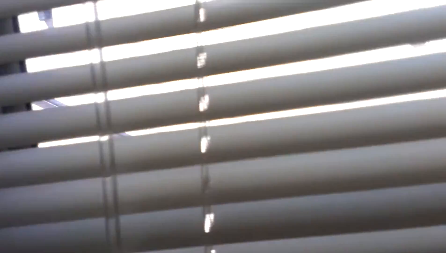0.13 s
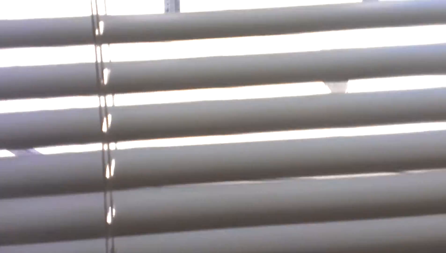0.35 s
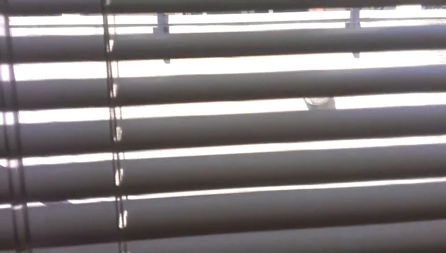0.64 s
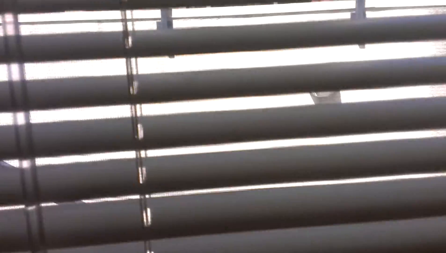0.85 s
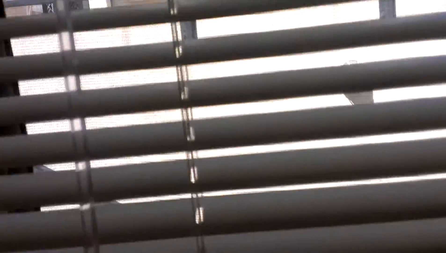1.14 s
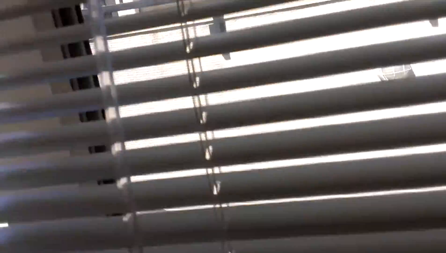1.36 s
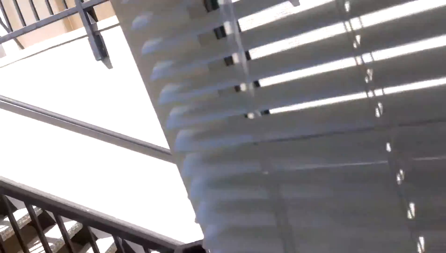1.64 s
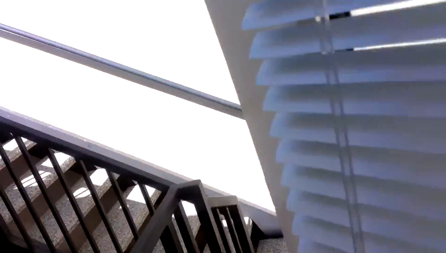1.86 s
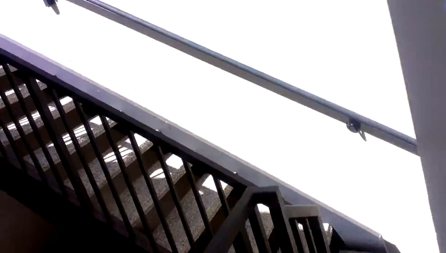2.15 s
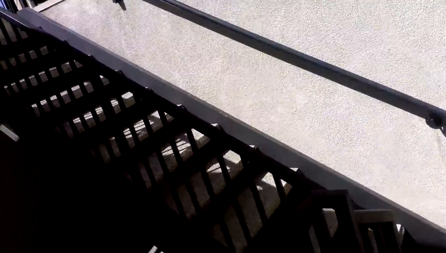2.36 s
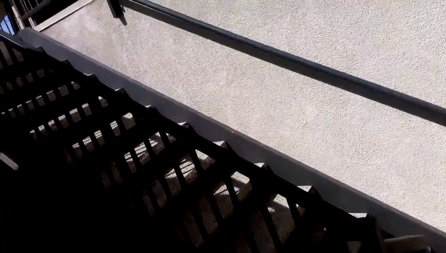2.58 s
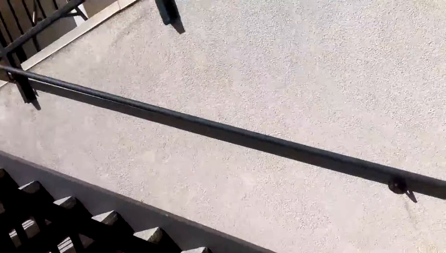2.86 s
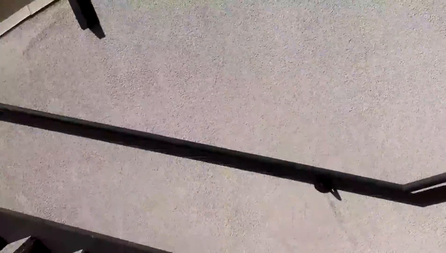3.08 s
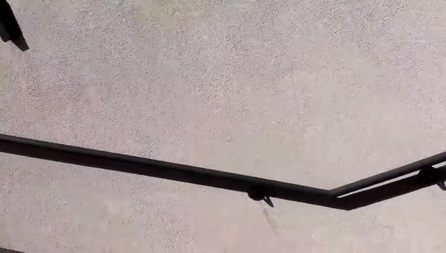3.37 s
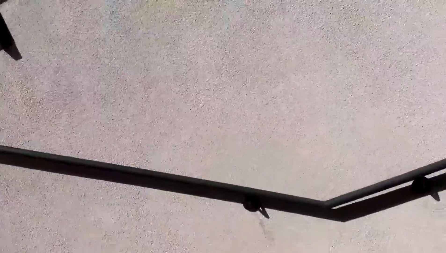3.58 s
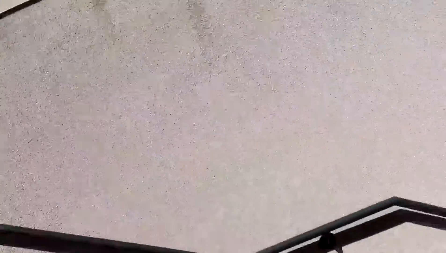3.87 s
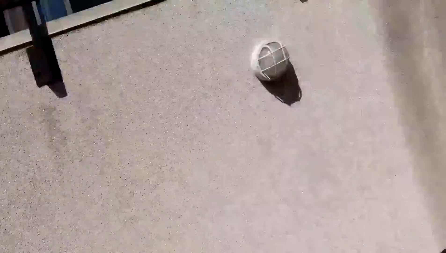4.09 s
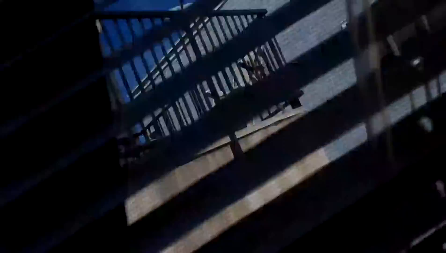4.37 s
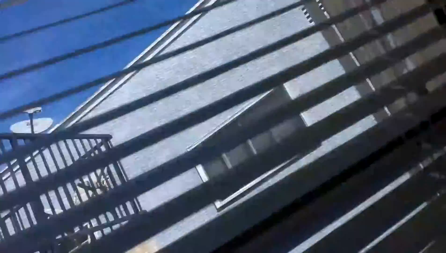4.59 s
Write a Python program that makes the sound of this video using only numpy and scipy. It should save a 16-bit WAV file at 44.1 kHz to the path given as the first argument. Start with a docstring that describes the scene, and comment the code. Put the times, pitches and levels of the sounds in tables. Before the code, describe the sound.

Hard bright clicks and rattles of window blind slats over dull door bumps, thinning to near quiet before another short burst of clatter.

```python
"""Small quiet room: plastic blind slats clack, rattle and scrape close by as the door carrying them is handled.
Clacks are beating damped modes plus a noise crack; ticks are band-passed snaps with a hollow knock behind.
Rattle is lumpy stereo noise and small chips through slat resonances, gated by shakes of the blind.
Rail and frame ring in low modes; the door rumbles under pushes and rings low at blows.
The room answers with decaying noise tails; under it all lie room air and a thin whine."""
import sys
import numpy as np
from scipy import signal
from scipy.fft import rfft, irfft, next_fast_len
from scipy.io import wavfile
from scipy.ndimage import uniform_filter1d, map_coordinates

SR = 44100
rng = np.random.default_rng(int(sys.argv[2]) if len(sys.argv) > 2 else 0)


def wav_record(signal):
    """Record a signal, one row per channel, as 16-bit PCM in the file named by sys.argv[1]."""
    frames = np.transpose(np.atleast_2d(signal))
    bounded = np.clip(frames, -1, 1)
    # unit amplitude maps onto the largest positive 16-bit level
    quanta = np.round(bounded * 32767).astype(np.int16)
    wavfile.write(sys.argv[1], SR, quanta)


N = 208271


def amp(db):
    """Decibels to gain."""
    return 10 ** (np.asarray(db) / 20)


def unit(x):
    """Scaled to rms 1."""
    return x / np.sqrt(np.mean(x ** 2) + 1e-20)


def along(points, hz):
    """Interpolates (f/Hz, value) points on a log frequency axis."""
    f, v = np.transpose(points)
    return np.interp(np.log(hz + 1), np.log(f + 1), v)


def curves(rows):
    """One per-sample curve for each column after t/s."""
    s, *cols = np.transpose(rows)
    return [np.interp(np.arange(N) / SR, s, c) for c in cols]


def wobble(rate_hz):
    """Smooth random curve with rate_hz knots a second."""
    knots = rng.standard_normal(int(N * rate_hz / SR) + 4)
    return map_coordinates(knots, [np.arange(N) * rate_hz / SR])


def filtered(x, response):
    """x through a complex frequency response."""
    m = next_fast_len(N + SR // 2)
    return irfft(rfft(x, m) * response(np.fft.rfftfreq(m, 1 / SR)), m)[..., :N]


def modes(table):
    """Causal response of (f/Hz, width/Hz, level/dB) resonances, alternating in sign."""
    def response(f):
        total = 0
        for k, (c, w, db) in enumerate(table):
            total = total + (-1) ** k * amp(db) * 1j * f * w / (c * c - f * f + 1j * f * w)
        return total
    return response


def shaped(spectrum):
    """Gain of a (f/Hz, level/dB) spectrum."""
    return lambda hz: amp(along(spectrum, hz))


def grainy(response, spread_db, rate_hz):
    """Stereo noise of rms 1, its level lumped at random into short contacts, through a response."""
    # left-right likeness: f/Hz, correlation
    likeness = [(60, 0.98), (180, 1), (550, 0.85), (1650, 0.1), (4970, 0.2), (15000, 0.56)]

    def mid_side(hz):
        turn = np.arccos(np.clip(along(likeness, hz), -1, 1)) / 2
        return response(hz) * [np.cos(turn), np.sin(turn)]

    lumps = amp(spread_db * np.clip(wobble(rate_hz), -2, 2))
    mid, side = filtered(rng.standard_normal((2, N)) * lumps, mid_side)
    return unit(np.array([mid + side, mid - side]))


def room(x):
    """Fresh noise tail for each ear, each frequency decaying at its own speed."""
    # room decay: f/Hz, t60/s
    decay = [(200, 0.22), (2000, 0.14), (6000, 0.39), (14000, 0.2)]
    hz, t, z = signal.stft(rng.standard_normal((2, SR // 3)), SR, nperseg=256)
    fade = amp(-60 * t / along(decay, hz)[:, None])
    tail = signal.istft(z * fade, SR, nperseg=256)[1]
    wet = signal.fftconvolve(x[None], tail / np.linalg.norm(tail[0]), axes=1)
    return np.pad(wet, ((0, 0), (200, 0)))  # 200-sample pre-delay


def ring(hz, db, t60_s, t):
    """One damped mode."""
    return amp(db - 60 * t / t60_s) * np.sin(2 * np.pi * hz * t)


def add(out, s, sound):
    """Mixes a sound in at time s."""
    i = round(s * SR)
    out[..., i:i + sound.shape[-1]] += sound


def spells(rows):
    """Rise, hold, fall per row, powers adding; a main gain curve, then one per relative column."""
    rise_db = 15.5  # depth below peak at the start time
    t, power = np.arange(0, N + 32, 32) / SR, 0
    for s, rise_s, hold_s, db, fall_db_s, *rel_db in rows:
        after = t - s
        climb_db = rise_db * np.clip(1 - after / rise_s, 0, None)
        drop_db = fall_db_s * np.clip(after - rise_s - hold_s, 0, None)
        columns = amp(2 * np.array([0, *rel_db]))[:, None]
        power = power + amp(2 * (db - climb_db - drop_db)) * columns
    return [np.interp(np.arange(N) / SR, t, gain) for gain in np.sqrt(power)]


def floor():
    """Room air as shaped noise, and a thin 15 kHz electronic whine that drops in level."""
    # air spectrum: f/Hz, level/dB
    air_spectrum = [(12, -36.5), (20, -9), (31, -7), (49, -35), (124, 4.5), (297, -10), (361, -6),
                    (566, -24), (1180, -35), (5830, -31), (9150, -37.5), (14700, -36.5), (16500, -64.5)]
    # air level: t/s, level/dB
    air_level = [(0, -59), (0.2, -49), (0.3, -77), (0.38, -62), (0.8, -49.5), (4.72, -48.5)]
    # whine level before a 7.5 dB lift: t/s, level/dB
    whine_level = [(0, -65), (2.6, -70.5), (2.7, -87)]
    tone = np.sin(2 * np.pi * 15000 * np.arange(N) / SR)
    whine = amp(curves(whine_level)[0] + 7.5) * tone
    air = grainy(shaped(air_spectrum), spread_db=0.0, rate_hz=34)
    return amp(curves(air_level)[0]) * air + whine


def door():
    """Door panel rumbles under the hand and answers each blow with a short low ring."""
    # pushes and rubs of the hand: t/s, rise/s, hold/s, level/dB, fall/(dB/s), hollow part re main/dB
    pushes = [(0.0, 0.0045, 0.086, -30.5, 112, -4), (0.366, 0.0087, 0.027, -34, 434, 9.5),
              (0.45, 0.017, 0.26, -54, 95, 10.5), (0.74, 0.048, 0.056, -35.5, 98, 3),
              (0.83, 0.047, 0.028, -22, 132, -4.5), (1.02, 0.076, 0.075, -42, 92, 3),
              (1.12, 0.035, 0.073, -31, 200, -7), (1.37, 0.017, 0.073, -31, 210, 3.5),
              (1.5, 0.094, 0.25, -35.5, 103, -5), (1.81, 0.032, 0.12, -30, 40, 1),
              (2.05, 0.065, 0.14, -36, 148, 5.5), (2.28, 0.017, 0.028, -36, 194, 4),
              (2.4, 0.022, 0.46, -39, 48.5, -1), (2.8, 0.02, 0.0086, -48, 155, 18.5),
              (3.07, 0.069, 0.067, -28, 602.5, -0.5), (3.2, 0.017, 0.029, -38, 23, -0.5),
              (3.99, 0.019, .01, -43, 171, -3), (4.15, 0.069, 0.06, -38.5, 279, 0.5),
              (4.36, 0.084, 0.03, -38, 290, 6), (4.545, 0.013, .2, -37.5, 100, 6)]
    # blows: t/s, level/dB, f/Hz
    knocks = [(0.367, -14.5, 461), (0.782, -20, 484), (1.149, -12.5, 187), (1.171, -9.5, 126),
              (1.208, -9.5, 175), (1.249, -26.5, 189), (1.384, -11, 160.5), (1.823, -13, 234),
              (1.976, -17, 136), (2.473, -21.5, 173), (2.524, -20, 178), (2.705, -22, 255),
              (2.818, -19.5, 322), (3.139, -13.5, 221.5), (3.191, -14, 239), (4.554, -24, 346)]
    # rumble spectrum: f/Hz, level/dB
    rumble = [(24, -74.5), (40, -42), (74, -24.5), (168, 1.5), (340, -11.5), (440, -35.5), (750, -120)]
    # panel modes: f/Hz, width/Hz, level/dB
    panel_modes = [(177.6, 12, 0), (261, 21, -2.5), (129.9, 42, -7)]
    # hollow upper part: f/Hz, level/dB
    hollow_spectrum = [(180, -7), (300, 3), (373, 8), (435, 3), (472, 2.5), (681, -4), (950, -15.5),
                       (1240, -22.5), (2090, -120)]
    # balance: t/s, left minus right/dB
    balance = [(0.0, -2), (0.68, 0.5), (1.09, -0.5), (1.145, 10), (1.22, 10), (1.35, 0), (1.38, 5),
               (1.52, -0.5), (4.25, -0.5), (4.72, 2.5)]

    gain, hollow_gain = spells(pushes)
    low = grainy(shaped(rumble), spread_db=3, rate_hz=40)
    low = amp(-3) * (low + grainy(modes(panel_modes), spread_db=3, rate_hz=40))
    hollow = amp(-5.0) * hollow_gain * grainy(shaped(hollow_spectrum), spread_db=4.5, rate_hz=88)

    blows, t = np.zeros(N + SR), np.arange(SR // 6) / SR
    rise = 1 - np.exp(-t / 0.0045)
    for s, db, hz in knocks:
        panel = ring(hz, -3, .065, t) + ring(1.62 * hz, -12, .06, t) + ring(1.95 * hz, -14, .06, t)
        add(blows, s, amp(db) * rise * panel)
    side = amp(curves(balance)[0] * [[.5], [-.5]])
    return side * (amp(-2.5) * (gain * low + hollow) + blows[:N])


def shaken(knocks, mode_hz, fall_db_s):
    """Low modes set ringing by each knock; lesser jolts keep shifting their phase and size."""
    t = np.arange(N) / SR
    rows = [(s, 0.0018, 0, 0, fall_db_s, *dbs) for s, *dbs in knocks]  # 1.8 ms rise, no hold
    out = 0
    for gain, hz in zip(spells(rows)[1:], mode_hz):
        swell = amp(2.5 * wobble(30))
        shift_rad = 1.1 * wobble(45)
        out = out + gain * swell * np.sin(2 * np.pi * hz * t + shift_rad)
    return out


def rail():
    """Bottom rail rings in low modes when knocked; the hollow frame rings at the last push."""
    # rail knocks: t/s, then level/dB of each rail mode
    rail_knocks = [(0.205, -45.5, -65, -58, -68, -65), (0.366, -79, -32.5, -49.5, -35, -43.5),
                   (0.447, -37, -47.5, -61, -62, -65), (0.55, -44, -43.5, -51, -49.5, -53.5),
                   (0.622, -61.5, -37, -62, -59, -62), (0.72, -40, -51, -60, -62, -48),
                   (0.755, -34, -40, -37, -38, -47), (0.83, -45, -43, -54, -35.5, -43),
                   (0.87, -48, -31, -62, -52, -35), (1.022, -65, -43.5, -48, -40, -41),
                   (1.13, -54, -56, -36, -44.5, -44), (1.62, -39.5, -57, -52, -70, -65.5),
                   (1.73, -41, -58, -71, -65, -59), (1.825, -36, -31.5, -63, -71, -74),
                   (1.96, -43, -38, -38.5, -46, -48), (2.06, -55, -71, -48, -43, -44),
                   (2.14, -58, -54, -37.5, -41, -53), (2.205, -51, -34, -40, -56, -61)]
    # rail modes: f/Hz
    rail_hz = [1283, 476, 752, 840, 963]
    # frame knocks: t/s, then level/dB of each frame mode
    frame_knocks = [(4.557, -54, -41, -32.5, -38), (4.597, -30, -39, -28, -35),
                    (4.642, -25, -34, -36, -30.5), (4.67, -34, -38, -37, -55),
                    (4.714, -31.5, -26, -33.5, -42)]
    # frame modes: f/Hz
    frame_hz = [554, 730, 370, 650]
    return shaken(rail_knocks, rail_hz, fall_db_s=159) + shaken(frame_knocks, frame_hz, fall_db_s=180)


def pings():
    """A free slat holds one mode, split into three close, beating tones."""
    # single slats left ringing: t/s, level/dB, f/Hz, t60/s
    free_slats = [(0.454, -29, 3750, 0.24), (1.832, -14, 5130, 0.15), (2.798, -7.5, 4220, 0.055),
                  (2.83, -25, 3525, 0.18), (2.895, -34, 2611, 0.19), (4.026, -22, 3380, 0.066),
                  (4.025, -47.5, 3850, 0.38), (4.205, -35, 3710, 0.15), (4.229, -53, 3770, 0.26)]
    out, t = np.zeros(N + SR), np.arange(SR // 2) / SR
    rise = 1 - np.exp(-t / 0.01)
    for s, db, hz, t60_s in free_slats:
        tones = ring(hz, db, t60_s, t)
        tones = tones + ring(1.007 * hz, db - 10, t60_s, t) + ring(.989 * hz, db - 13, t60_s, t)
        add(out, s, rise * tones)
    return out[:N]


def ticks():
    """Slat ends tick on the door: a short band-passed noise snap, a hollow knock just behind it."""
    # ticks: t/s, snap peak/dB, knock re snap/dB, snap centre f/Hz
    slat_ends = [(0.0045, -2, -17, 4780), (0.2082, -31, -29, 7060), (0.34, -33, -47, 7160),
                 (0.87, -26, -20, 5600), (0.883, -27, -23, 5400), (0.901, -19, -20, 6000),
                 (0.916, -18, -20, 5800), (0.928, -20, -26, 5900), (0.9417, -16, -22, 7960),
                 (1.07, -15, -20, 6600), (1.1319, -15, -7.5, 5160), (1.1695, -11.5, -20, 5300),
                 (1.5963, -35, -14, 6050), (1.728, -13, -29, 5560), (1.8256, -5, -15, 5680),
                 (1.913, -22.5, -16, 7020), (1.952, -13.5, -12, 5650), (1.973, -26.5, 8.5, 990),
                 (2.0628, -17.5, -3.5, 5400), (2.0877, -18, -6, 4530), (2.1102, -17.5, -3, 4500),
                 (2.1408, -11.5, -5.5, 4640), (2.17, -15.5, -6.5, 4640), (2.2083, -28.5, 10, 6100),
                 (2.631, -40, -9, 1270), (3.1327, -38.5, -14.5, 5860), (3.133, -35, -8, 1660),
                 (3.4014, -46, -3, 4350), (3.6566, -35, -14, 5700), (4.127, -36, -18, 6200),
                 (4.372, -45.5, -20, 1400), (4.5964, -14.5, -10.5, 5500)]
    edge_ratio = 1.33  # band edge over centre
    rise_s, t60_s, knock_lag_s = 0.00021, 0.027, 0.00161
    out, t = np.zeros((2, N + SR)), np.arange(SR // 20) / SR
    envelope = (1 - np.exp(-t / rise_s)) * amp(-60 * t / t60_s)
    for s, db, knock_db, hz in slat_ends:
        band = signal.butter(2, [hz / edge_ratio, hz * edge_ratio], "band", fs=SR)
        snap = envelope * signal.lfilter(*band, rng.standard_normal(len(t)))
        snap = amp(db) * snap / np.abs(snap).max()
        level_db = db + knock_db
        knock = ring(518, level_db + 1.5, 0.022, t) + ring(800, level_db - 4.5, 0.0099, t)
        add(out, s, snap)
        add(out, s + knock_lag_s, knock)
        add(out, s, amp(-11) * room(snap))
    return out[:, :N]


def patchy(x, patchy_db):
    """Now one slat, now another is loudest: random gain patches in time and frequency."""
    z = signal.stft(x, nperseg=512)[2]
    field = uniform_filter1d(rng.standard_normal(z.shape[1:]), size=5, axis=0)
    field = uniform_filter1d(field, size=9, axis=1)
    return unit(signal.istft(z * amp(patchy_db * unit(field)), nperseg=512)[1][:, :N])


def chips(table):
    """Small clacks at random moments, each ringing briefly near one slat mode; stereo, rms 1."""
    chips_per_s, t60_s = 450, .05
    spread_db, detune_sd, pan_sd_db = 2, .025, 7  # detune: log frequency
    when, which, size = rng.random((int(chips_per_s * N / SR), 3)).T
    detune, pan = rng.standard_normal((len(when), 2)).T
    hz, _, db = np.array(table)[(which * len(table)).astype(int)].T
    hz = hz * np.exp(detune_sd * detune)
    db = db - spread_db * np.log(size)
    t = np.arange(int(t60_s * SR / 2)) / SR
    sound = ring(hz[:, None], db[:, None], t60_s, t)
    at = ((when * N).astype(int)[:, None] + np.arange(len(t))).ravel()
    ears = []
    for side in (1, -1):
        panned = sound * amp(side * pan_sd_db * pan / 2)[:, None]
        ears.append(np.bincount(at, panned.ravel(), N + len(t))[:N])
    return unit(np.array(ears))


def rattle():
    """Countless small slat contacts: ringing clatter, bright hiss and a duller scrape."""
    # shakes: t/s, rise/s, hold/s, level/dB, fall/(dB/s), lower rings, bright hiss, mid scrape re main/dB
    shakes = [(0.0, 0.005, 0.013, -19, 95, -5, -5, -4.5), (0.07, 0.029, 0.079, -30, 222, -3.5, -4.5, -3),
              (0.195, 0.012, 0.012, -34.5, 264, -11, 7.5, -10),
              (0.368, 0.0096, 0.0092, -37.5, 504, -15, -3, -3),
              (0.45, 0.0044, 0.0093, -24.5, 94, -3, -2.5, -9.5),
              (0.648, 0.0021, 0.011, -23.5, 600, -22.5, -31, -11),
              (0.665, 0.02, 0.02, -29.5, 208, -4, -2, -6.5),
              (0.712, 0.0023, 0.014, -20.5, 60, -5, -7, -9.5),
              (0.8, 0.061, 0.068, -30, 260, -22, -3.5, -2.5), (0.96, 0.094, 0.12, -34.5, 200, -7, -4, -4.5),
              (1.167, 0.0019, 0.082, -28, 208, -24, -5, -20),
              (1.375, 0.0098, 0.035, -34, 105, -11, -3.5, -12.5),
              (1.6, 0.028, 0.021, -30.5, 210, -11, 4, -10.5),
              (1.728, 0.0038, 0.031, -23.5, 108, -9, -5, -14.5),
              (1.825, .006, 0.0066, -21.5, 58, -10, -6, -12), (1.95, 0.21, 0.017, -32, 140, 0, 1.5, 0.5),
              (2.6, 0.027, 0.032, -56.5, 98, -7, 2, 8), (2.722, 0.0095, 0.082, -39.5, 92, -15, 7.5, -5.5),
              (2.76, 0.026, 0.11, -22.5, 227, -8, -15.5, -29.5),
              (2.9, 0.022, 0.052, -37, 254, -10, -9.5, -20.5),
              (3.131, 0.0039, 0.042, -54.5, 499, -2.5, -0.5, 7),
              (3.63, 0.026, 0.018, -43.5, 299, -13, -7.5, -4.5), (3.7, 0.05, 0.14, -65.5, 42, -10, 9, 3),
              (4.018, 0.0059, 0.01, -31, 402.5, -16, -20.5, -24.5),
              (4.04, 0.011, .02, -47, 84, -5, -8, -29), (4.194, 0.016, 0.047, -31, 236, -8, -7, -13),
              (4.39, 0.04, 0.022, -29.5, 162, -6.5, -5.5, -5.5),
              (4.555, 0.054, 0.02, -23.5, 16, -7.5, -11.5, -11)]
    # upper slat resonances: f/Hz, width/Hz, level/dB
    upper_modes = [(5070, 20, -4.5), (5320, 77, -1), (5670, 55, 3), (6150, 200, 1), (5700, 278, -3.5),
                   (6510, 400, -1.5)]
    # lower slat resonances: f/Hz, width/Hz, level/dB
    lower_modes = [(1942, 98, -13.5), (3050, 150, -1), (3463, 22, 1.5), (3596, 20, -1.5), (3895, 230, 1.5),
                   (4370, 85, -0.5)]
    # broad upper slat noise: f/Hz, level/dB
    upper_body = [(2590, -22), (4400, -8.5), (4830, -5.5), (5780, -7.5), (6340, -15.5), (8000, -20),
                  (10400, -49.5), (17600, -120)]
    # broad lower slat noise: f/Hz, level/dB
    lower_body = [(1350, -35.5), (2300, -16.5), (2490, -8), (3410, 15.5), (4700, 4), (6110, -32.5),
                  (10300, -120)]
    # bright hiss: f/Hz, level/dB
    bright_spectrum = [(3820, -35.5), (6500, -0.5), (7420, -2.5), (8780, -4.5), (10700, -12.5),
                       (15100, -15), (16100, -40.5), (16500, -47)]
    # mid scrape: f/Hz, level/dB
    scrape_spectrum = [(410, -42), (700, -1.5), (1190, -1.5), (1290, 0.5), (2020, -5), (2800, -6.5),
                       (3640, -9.5), (6160, -120)]

    gain, low_gain, bright_gain, scrape_gain = spells(shakes)
    unrest_db = 1.5 * wobble(45)
    upper = amp(-5.0) * grainy(modes(upper_modes), spread_db=9.0, rate_hz=420)
    upper = upper + amp(-2.0) * grainy(shaped(upper_body), spread_db=-1, rate_hz=240)
    upper = amp(-2.5) * patchy(upper, patchy_db=1.6) + amp(-4) * chips(upper_modes)

    lower = amp(-2) * grainy(modes(lower_modes), spread_db=5, rate_hz=250)
    lower = lower + amp(-5) * grainy(shaped(lower_body), spread_db=4, rate_hz=300)
    lower = amp(-3) * patchy(lower, patchy_db=1.6) + amp(-3) * chips(lower_modes)

    bright = grainy(shaped(bright_spectrum), spread_db=2.0, rate_hz=380)
    scrape = grainy(shaped(scrape_spectrum), spread_db=2.5, rate_hz=120)
    mix = gain * upper + low_gain * lower + bright_gain * bright + scrape_gain * scrape
    return amp(unrest_db - 4.5) * mix


def clacks():
    """Each hard slat contact rings beating clusters of modes, cracks, and excites the room."""
    # contacts: t/s, level/dB, upper ring f/Hz, lower ring f/Hz, lower re upper/dB,
    # crack re contact before a 3.5 dB lift/dB, left minus right/dB
    contacts = [(0.0044, -17.5, 6200, 4750, -8, 0.5, 2), (0.2255, -23, 5920, 4070, -10, -10.5, -1.5),
                (0.37, -26.5, 5810, 4630, -9, -28, 1.5), (0.451, -15, 5340, 3640, -18, -12.5, 3),
                (0.5604, -21.5, 5950, 3430, -14, -16, -4.5), (0.648, -3, 5866, 4280, -19.5, -35.5, 4.5),
                (0.7122, -15, 5710, 3610, -4.5, -18, -6), (1.027, -25, 6060, 4350, -5, -16, 3.5),
                (1.1682, -11.5, 5225, 4300, -26, -15, -0.5), (1.1978, -21.5, 5270, 4340, -23, -15, -1.5),
                (1.3823, -36.5, 6400, 4100, -13, -15, 2.5), (1.6229, -22, 6620, 3700, -34, -10, 5),
                (1.73, -15, 5760, 4110, -9, -31, 1.5), (1.8279, -19, 6000, 3280, 1.5, -31, 9.5),
                (2.7285, -29, 6480, 3240, -20, -7.5, -10.5), (2.7712, -25, 5500, 3030, -5.5, -4, -10),
                (2.7956, -16.5, 6200, 4450, -10, -17.5, 2), (2.8241, -22, 6270, 3484, 0.5, -19.5, -11.5),
                (2.8553, -15, 6090, 3910, -15, -26, -5), (2.8959, -15, 5970, 3660, -23, -34, -2.5),
                (4.0224, -34.5, 5860, 3290, 4.5, -34, -13.5), (4.201, -27, 5880, 3370, 2, -18, 3.5),
                (4.233, -26, 5480, 3550, -6, -23.5, -2), (4.557, -24.5, 6600, 4130, -1.5, -9.5, 0.5),
                (4.596, -26.5, 5440, 4480, 4, -19.5, -3.5), (4.6466, -32, 6560, 3900, 12, -20, 4),
                (4.7154, -14, 5730, 3790, -6, -28, 1.5)]
    # lower cluster: frequency ratio, level/dB
    lower_cluster = [(1, -5), (1.04, -8), (1.09, -9), (.82, -12), (.62, -19)]
    out, t = np.zeros((2, N + SR)), np.arange(SR // 5) / SR
    high = signal.butter(2, 7000, "high", fs=SR)
    rise = 1 - np.exp(-t / .0006)
    for s, db, hz, low_hz, low_db, crack_db, pan_db in contacts:
        upper = ring(hz, -3, .06, t) + ring(.981 * hz, -7, .08, t) + ring(1.055 * hz, -13, .05, t)
        lower = sum(ring(ratio * low_hz, low_db + level_db, .07, t) for ratio, level_db in lower_cluster)
        hiss = signal.lfilter(*high, rng.standard_normal(len(t)))
        crack = amp(crack_db + 3.5 - 60 * t / 0.035) * hiss
        hit = amp(db) * (rise * (upper + lower) + crack)
        add(out, s, hit * amp([[pan_db / 2], [-pan_db / 2]]))
        add(out, s, amp(-4.5) * room(hit))
    return out[:, :N]


def scene():
    """All sources together."""
    return floor() + door() + rail() + pings() + ticks() + rattle() + clacks()


def record(dry):
    """Small microphones lose deep bass and lean apart by frequency; nothing passes the band limit."""
    # channel balance: f/Hz, left minus right/dB
    balance = [(60, 3), (380, 0), (950, -.8), (2380, -1.5), (5980, 2.5), (15000, -3)]
    bass_hz, top_hz = 75, 16200

    def response(hz):
        bass = (1j * hz / bass_hz / (1 + 1j * hz / bass_hz)) ** 3
        return bass * amp(along(balance, hz) * [[.5], [-.5]]) * (hz < top_hz)

    return filtered(dry, response)


dry = scene()
out = record(dry)
wav_record(out)
```